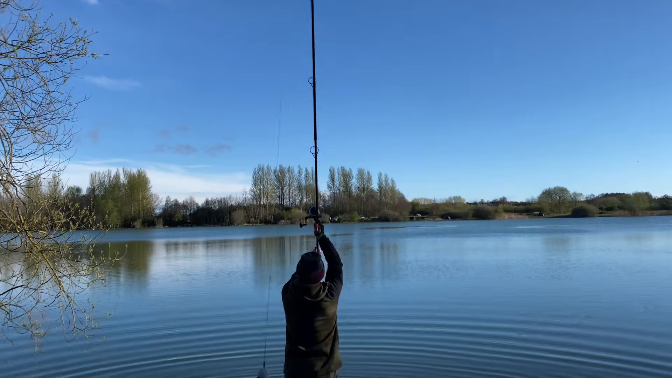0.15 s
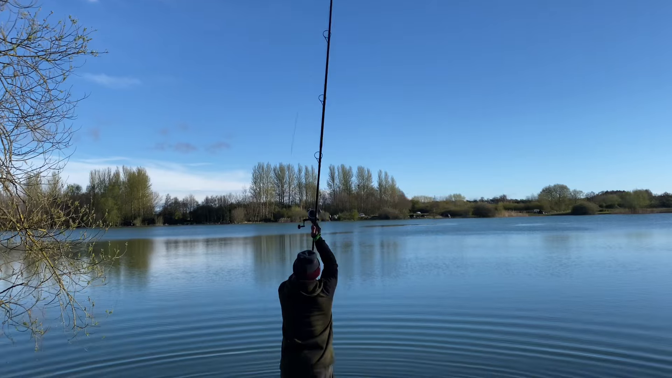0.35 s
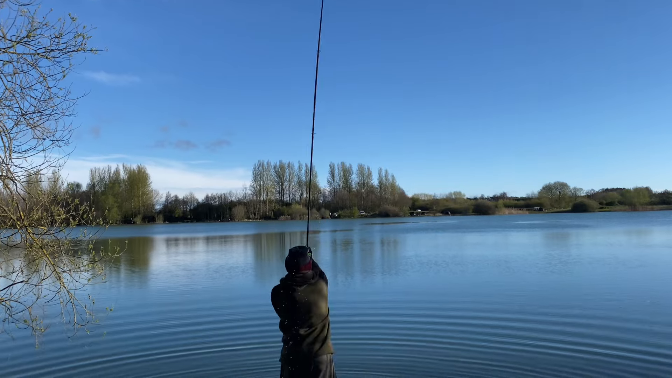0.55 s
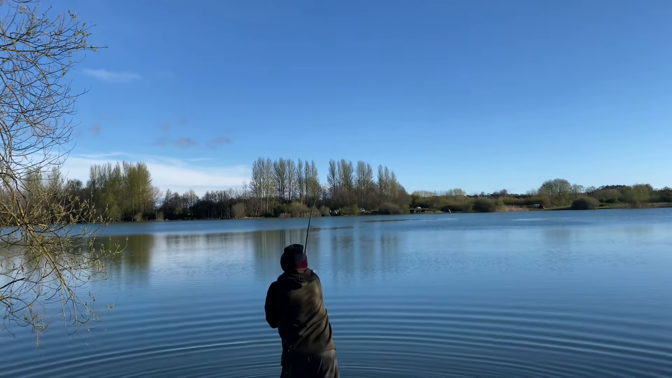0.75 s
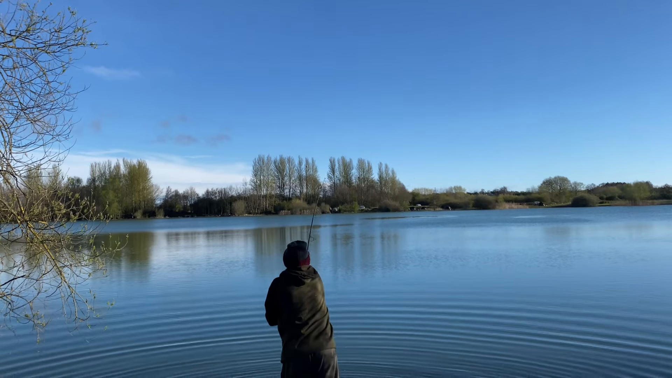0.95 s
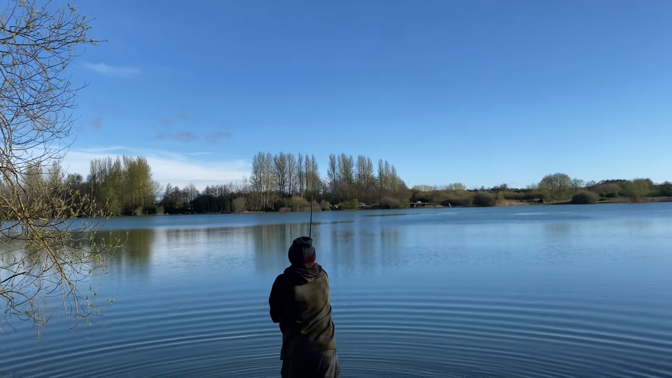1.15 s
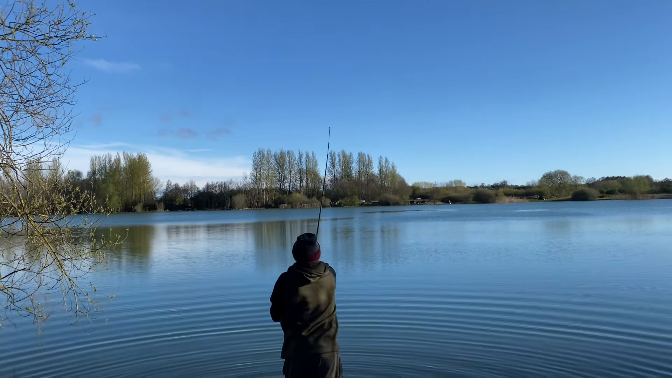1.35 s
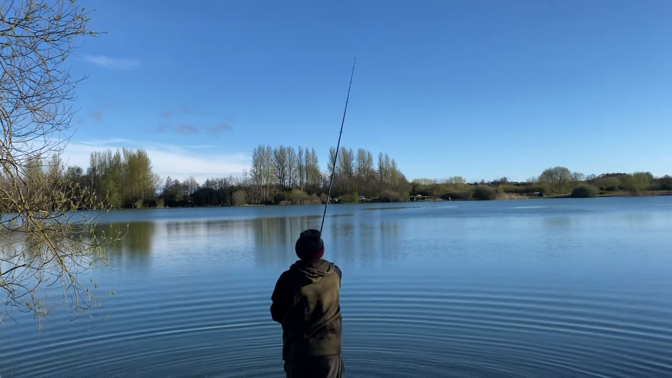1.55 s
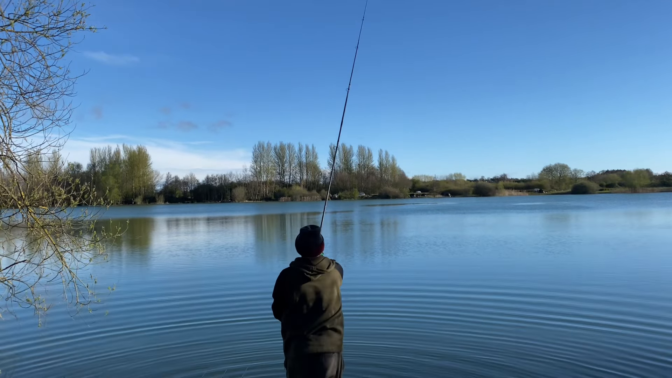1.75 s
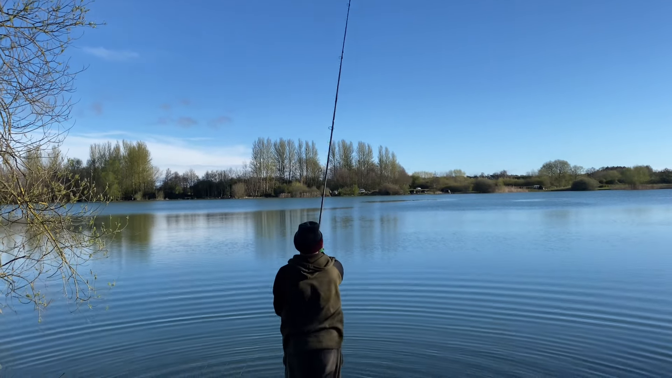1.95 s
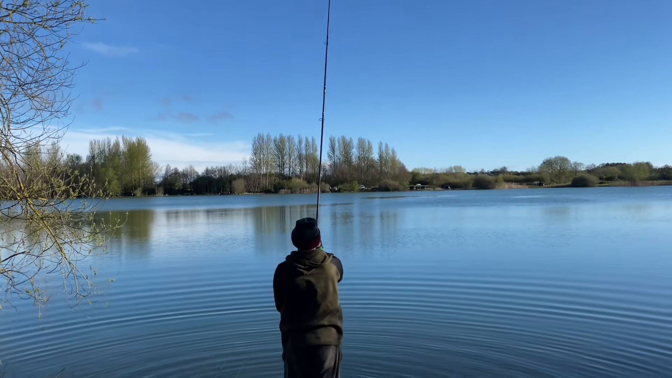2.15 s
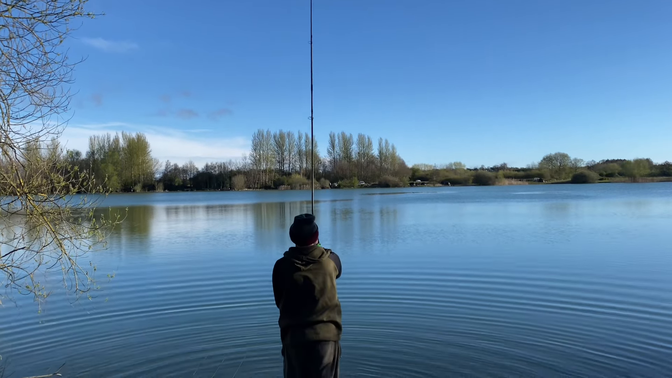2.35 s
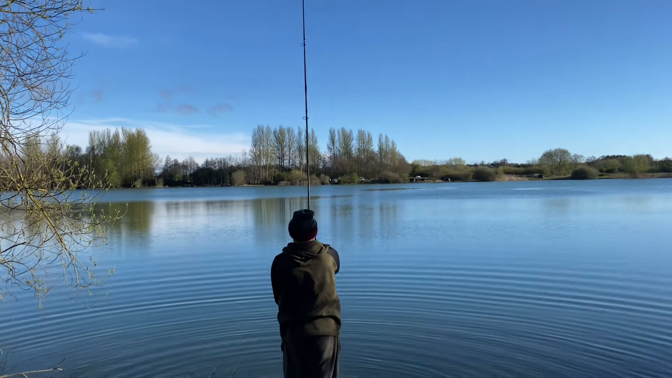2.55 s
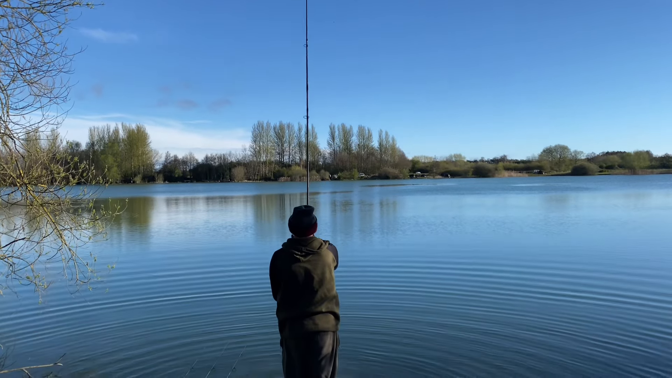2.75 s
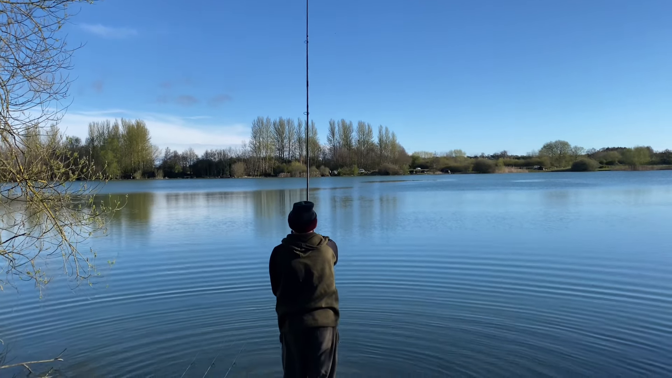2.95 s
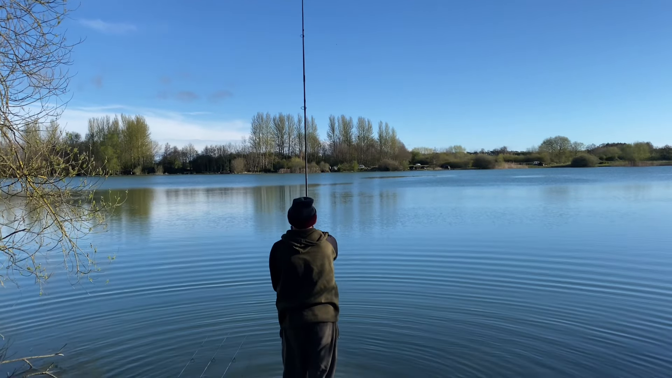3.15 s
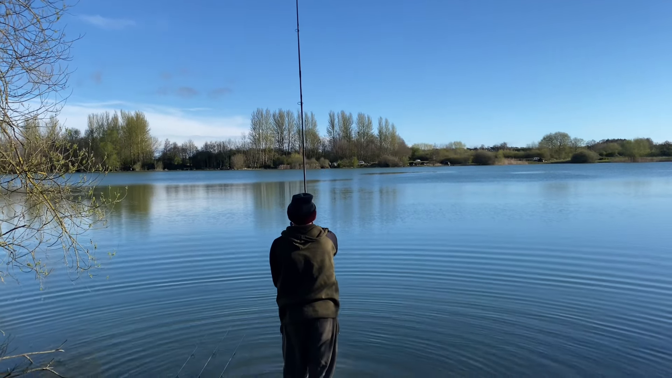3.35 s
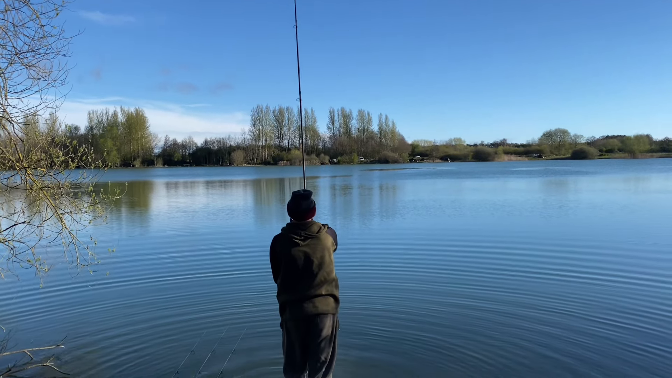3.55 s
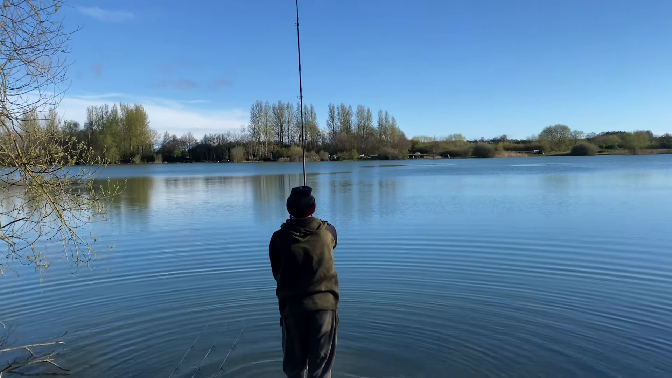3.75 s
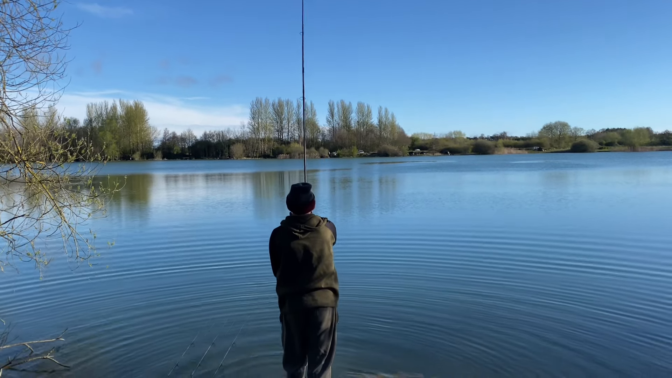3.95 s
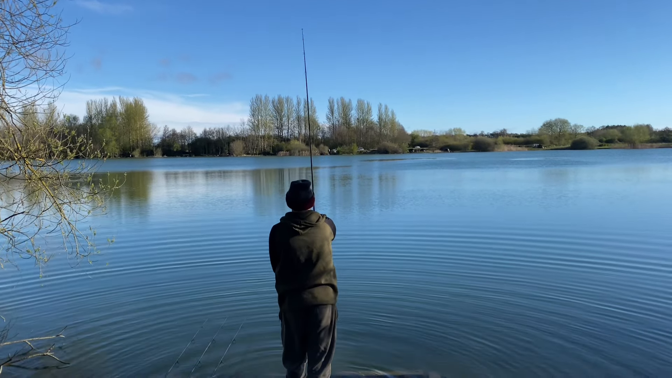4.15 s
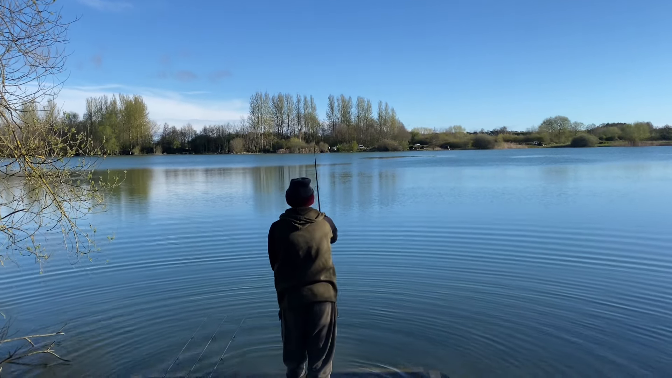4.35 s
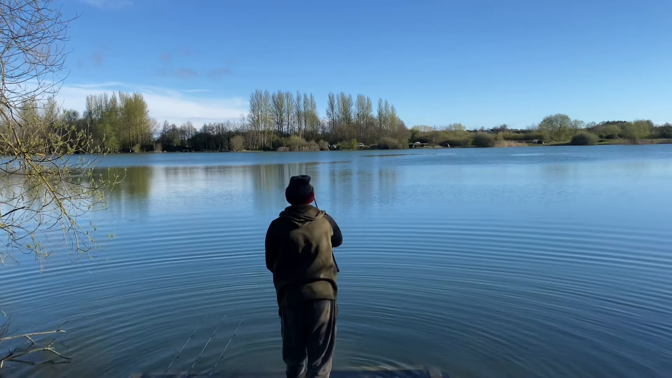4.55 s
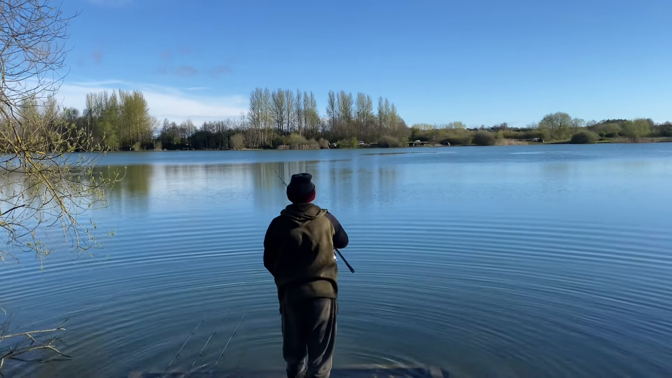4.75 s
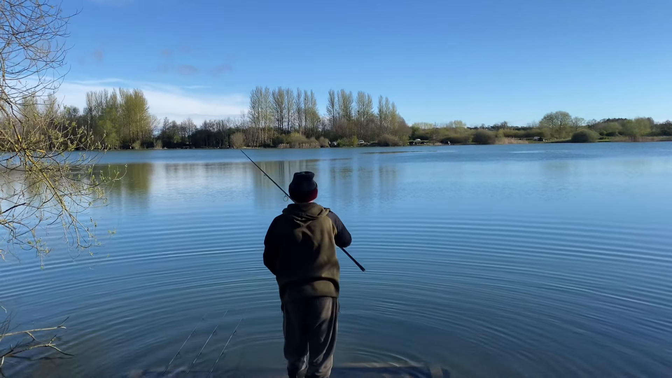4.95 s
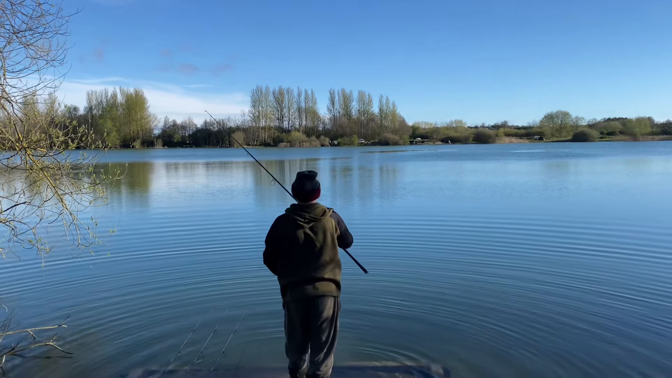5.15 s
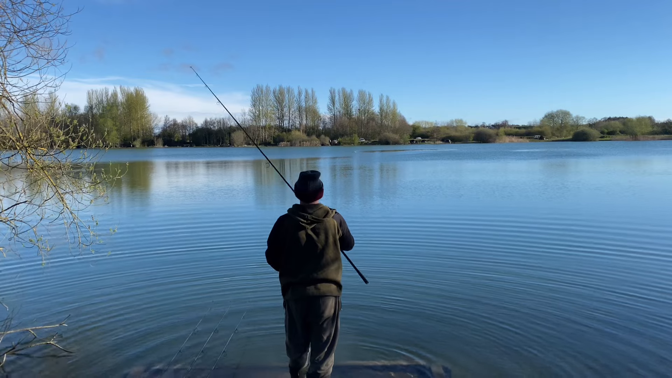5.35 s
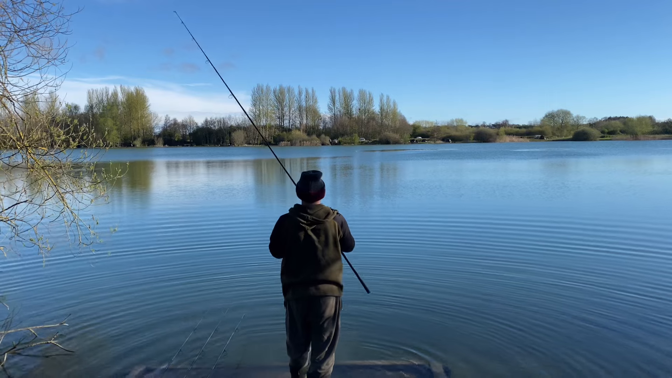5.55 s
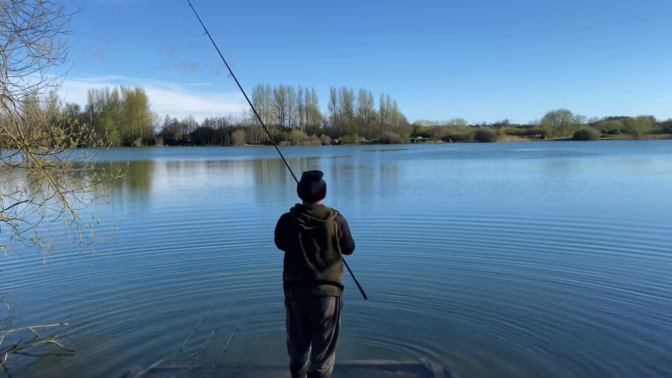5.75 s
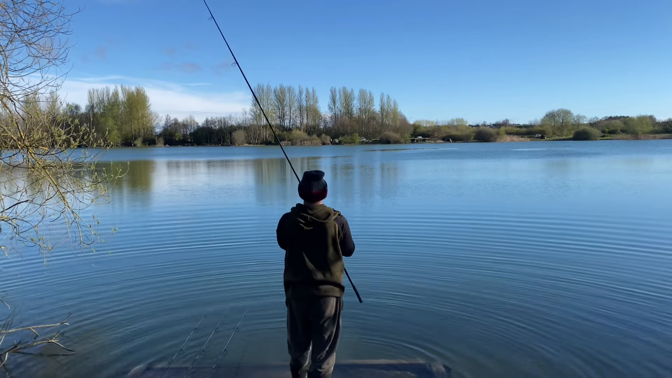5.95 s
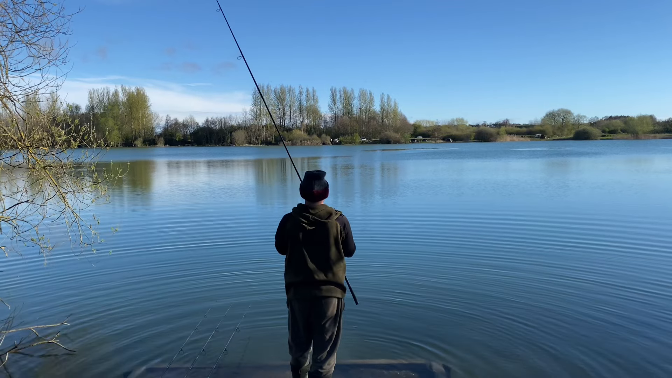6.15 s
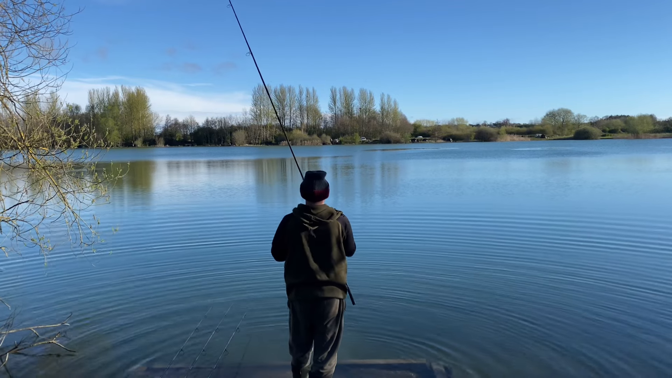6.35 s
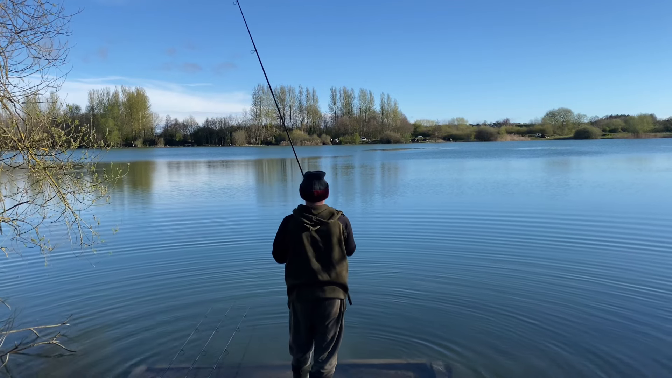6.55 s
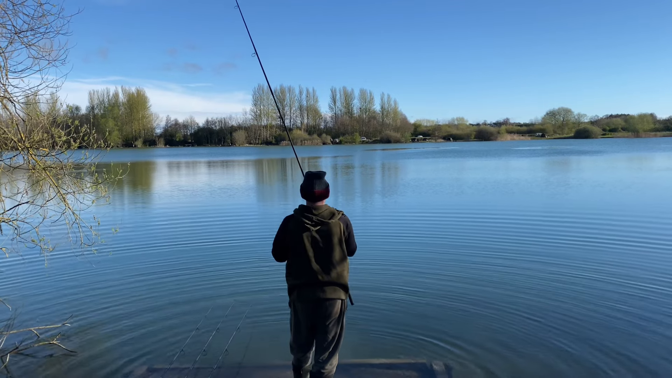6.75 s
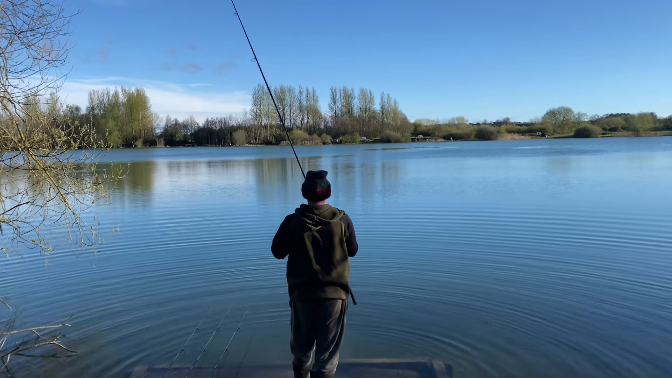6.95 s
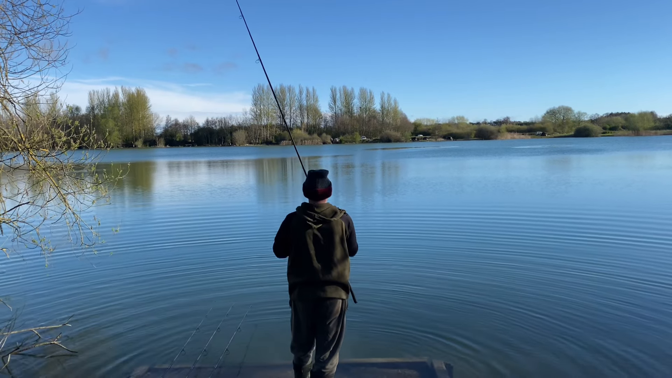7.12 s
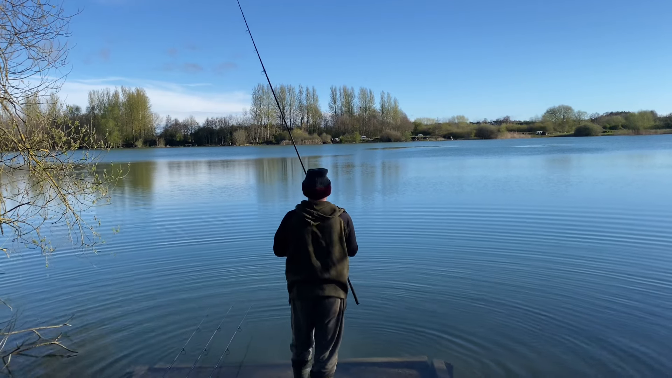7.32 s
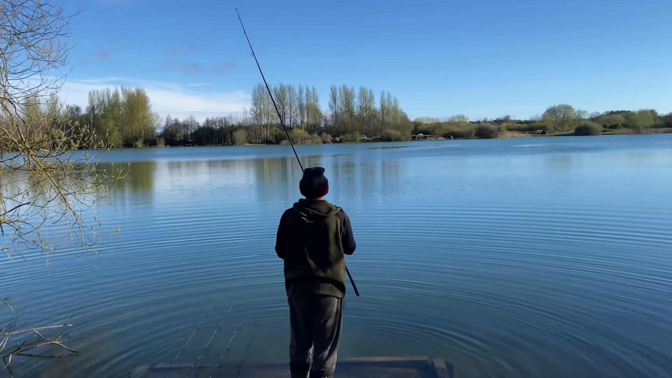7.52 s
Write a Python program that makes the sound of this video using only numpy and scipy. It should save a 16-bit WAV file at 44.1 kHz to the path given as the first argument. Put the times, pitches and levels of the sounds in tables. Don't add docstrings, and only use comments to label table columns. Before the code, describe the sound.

A fishing rod whooshes through a cast by a lake, line hisses off the reel and stops with a clack, then the reel clicks amid birdsong.

```python
import sys
import numpy as np
from scipy import signal
from scipy.fft import rfft, irfft, next_fast_len
from scipy.io import wavfile
from scipy.ndimage import uniform_filter1d

SR = 44100
rng = np.random.default_rng(int(sys.argv[2]) if len(sys.argv) > 2 else 0)


def attenuation_scalar(level_db):
    decades = np.asarray(level_db, float) / 20
    return 10 ** decades


def master_out(mix):
    frames = np.transpose(np.atleast_2d(mix))
    ceiling = np.clip(frames, -1, 1)
    pcm = np.round(ceiling * 32767).astype(np.int16)
    wavfile.write(sys.argv[1], SR, pcm)


N = 334278
TIME = np.arange(N) / SR
PADDED = next_fast_len(N, real=True)

# start_s, level_db
BREEZE_LEVEL = [(0.0, -53), (0.2, -47.5), (0.63, -47), (0.8, -55.5), (1.08, -59), (1.77, -59), (2.45, -51),
                (3.21, -50.5), (3.36, -54.5), (3.8, -48.5), (4.11, -53.5), (4.6, -47), (4.96, -51.5),
                (5.45, -46), (5.95, -49), (7.58, -49.5)]
# centre_s, level_db, pitch_hz, half_length_s
GUSTS = [
    (0.084, -24, 72, 0.011),
    (0.588, -25.5, 61, 0.013),
    (0.672, -24.5, 64, 0.0091),
    (2.347, -40, 55, 0.029),
    (.09, -35.5, 138, 0.0096),
    (5.283, -37.5, 66.5, 0.024),
    (6.7, -26.5, 68.6, 0.013),
    (7.457, -31.5, 63.4, 0.018),
]
# start_s, level_db
ROAD_LEVEL = [(0.0, -49), (0.4, -52.5), (0.63, -43), (0.78, -53), (1.77, -51.5), (2.22, -56.5),
              (3.21, -52.5), (3.8, -57.5), (4.11, -47.5), (4.96, -49), (5.45, -52.5), (5.95, -49.5),
              (6.69, -52), (7.58, -49.5)]
# frequency_hz, level_db
BUFFET_SPECTRUM = [(20, -28.5), (35, -19.5), (52, -5), (65, -4), (100, -5.5), (140, -24), (200, -42.5)]
DRONE_SPECTRUM = [(70, -28), (110, 2), (160, -0.5), (250, -5.5), (330, -11.5), (450, -18.5), (600, -27.5)]
ROAR_SPECTRUM = [(300, -11.5), (450, -1.5), (1000, -0.5), (1400, -5.5), (2000, -24.5), (3000, -47)]
LEAVES_SPECTRUM = [(1060, -21), (1800, -2.5), (3380, -12.5), (4470, -6), (5450, -14.5), (7230, -12),
                   (8600, -27), (10400, -20.5), (13000, -31)]
LEAVES_DB = -81
ROAR_DB, ROAR_FOLLOWS = -64.5, 0.05

# start_s, length_s, pitch_hz, level_db
WHISTLES = [(0.384, 0.038, 4310, -78), (1.102, 0.058, 5070, -71.5), (1.368, 0.073, 4900, -71),
            (1.36, 0.16, 4530, -74), (1.375, 0.045, 4210, -71), (1.479, 0.091, 3130, -64),
            (2.04, 0.05, 3460, -67), (2.193, 0.079, 2945, -68), (2.558, 0.043, 5850, -66.5),
            (4.07, 0.091, 3805, -79), (4.528, 0.2, 2260, -84), (3.994, 0.29, 3077, -83.5),
            (5.229, 0.043, 4370, -69), (5.456, .045, 8430, -79.5), (5.53, 0.13, 8400, -80),
            (5.55, .15, 6230, -91), (6.977, 0.11, 2600, -88)]
RISES = [
    (0.157, 0.015, 3760, -76),
    (2.609, 0.07, 6010, -65.5),
    (2.811, 0.092, 3756, -61.5),
    (4.018, 0.03, 3500, -85),
    (4.232, 0.083, 4540, -79),
    (6.68, 0.027, 6250, -87.5),
]
SLURS = [(0.388, 0.014, 3340, -69.5), (0.428, 0.018, 3360, -64), (.465, 0.027, 3470, -67),
         (.94, 0.06, 6300, -72), (0.987, 0.024, 3350, -68), (2.741, 0.048, 3620, -69),
         (4.16, 0.038, 3330, -70), (4.177, 0.064, 4800, -79), (4.223, 0.03, 3410, -69.5),
         (4.445, 0.03, 3220, -77), (5.096, 0.031, 5510, -73.5), (5.194, .036, 3810, -62),
         (5.68, 0.046, 7850, -85), (5.73, 0.096, 6770, -89), (6.387, .07, 4860, -83)]
BURRS = [(1.123, 0.237, 2078, -68), (2.917, .3, 4060, -74), (2.6, 0.136, 3625, -78.5),
         (4.273, 0.11, 3440, -81), (4.357, 0.179, 4320, -81.5), (4.664, 0.091, 4660, -84),
         (4.939, 0.29, 1780, -75), (5.144, 0.086, 4890, -77.5), (5.295, 0.31, 4680, -76.5),
         (5.768, 0.065, 4320, -82.5), (6.013, 0.22, 2440, -78.5), (5.998, 0.23, 3480, -85),
         (6.619, 0.015, 4270, -75.5), (7.134, 0.24, 1848, -75.5), (7.362, .17, 8640, -91),
         (7.52, 0.032, 8750, -86)]
# start_s, spacing_s, count, pitch_step_share
RHYTHMS = [
    (4.46, .1025, 5, -.018),
    (4.815, .038, 6, -.004),
    (4.8, .041, 6, -.014),
    (6.641, .0403, 9, .002),
    (7.008, .06, 2, .04),
    (7.014, .06, 2, .03),
    (7.155, .0965, 4, 0),
    (7.163, .096, 4, 0),
]
# length_s, start_hz, turning_hz, end_hz, burr_hz
TRILL_NOTES = [
    (.045, 7900, 7200, 6100, 25),
    (.022, 3300, 2800, 2780, 25),
    (.016, 3850, 3900, 3800, 30),
    (.02, 3700, 4150, 3750, 25),
    (.034, 3850, 4450, 4100, 25),
    (.03, 4400, 5000, 5300, 40),
    (.036, 3750, 4800, 4450, 30),
    (.028, 4500, 5200, 5600, 40),
]
TRILL_DB = [-74.5, -70, -76.5, -71, -71, -73, -73, -76.5]

# pitch_hz, width_hz, level_db, rise_s, t60_s
RELEASE_MODES = [(7060, 11900, 0, 0.00045, 0.016), (5560, 4000, -7.5, .035, 0.13),
                 (2600, 300, -9.5, 0.015, .1)]
CATCH_MODES = [(916, 99, -8, 0.02, 0.17), (2065, 380, -3.5, 0.012, 0.1), (2860, 3540, -5, .002, 0.28),
               (3980, 710, -1, .013, 0.057), (3200, 2900, -11, 0.043, 0.084), (7200, 2000, -17, .012, .15),
               (11000, 4600, -13, 0.012, 0.15)]
HANDLE_MODES = [(1350, 280, -4, .038, 0.07), (1910, 840, -7, 0.012, 0.37), (3130, 1860, 0, 0.0067, 0.44),
                (7100, 2200, -12, 0.02, 0.33), (9500, 2800, -23, 0.01, 0.47)]
BAIL_MODES = [(1250, 300, -4.5, 0.0008, 0.077), (3000, 370, -0.5, 0.0023, 0.035),
              (3630, 6600, -7.5, 0.00043, 0.051), (2280, 3200, -16, 0.018, 0.15),
              (9500, 6000, -21, 0.00069, .04), (7650, 7000, -18, 0.036, 0.13),
              (3100, 150, -28, 0.018, 0.47)]
LATCH_MODES = [(1840, 590, -0.5, 0.0012, 0.058), (3620, 910, -3.5, .001, 0.058),
               (6000, 2600, -2.5, 0.0015, 0.067), (10200, 3000, -9, 0.0018, 0.036)]
# start_s, level_db, brightness_db_per_octave
LATCH_CLICKS = [
    (.348, -63, 1.5),
    (5.427, -64, 0.5),
    (7.033, -58.5, -3),
]
# start_s, level_db, pitch_hz, width_hz, t60_s
CREAKS = [
    (.675, -53.5, 3400, 394, 0.28),
    (.725, -50.5, 1660, 600, 0.095),
    (0.825, -58.5, 4000, 5000, 0.18),
    (0.821, -51, 1395, 200, 0.089),
    (1.746, -53.5, 2920, 1200, 0.016),
    (2.254, -48, 2000, 300, 0.012),
    (2.275, -61, 4000, 3000, 0.025),
    (5.54, -70.5, 2230, 1500, 0.066),
    (5.709, -73, 1960, 298, .08),
]
CREAK_RISE = 0.043
# start_s, level_db
RELEASE_AT, CATCH_AT, HANDLE_AT, BAIL_AT = (.572, -38), (3.87, -47), (5.924, -57), (6.215, -43)

# start_s, low_swish_db, high_over_low_db
WHIP_LEVEL = [
    (0.44, -90, 9),
    (0.458, -64, -17),
    (0.52, -64.5, 4.5),
    (0.622, -47, -1.5),
    (0.76, -57.5, -3.5),
    (0.92, -82.5, 11.5),
]

# start_s, lip_drag_db, ring_and_blank_slap_db
LINE_LEVEL = [
    (0.47, -83, 0),
    (0.58, -48.5, 6),
    (0.75, -59, 6),
    (0.8, -65, 0),
    (1.3, -67, -2),
    (1.72, -59.5, 0.5),
    (2.23, -68, 4),
    (2.5, -75.5, -0.3),
    (3.86, -78.5, -1.5),
]
# start_s, coils_per_s
COIL_RATE = [
    (.5, 165),
    (1.5, 144),
    (2.2, 120),
    (2.7, 96),
    (3.5, 82),
    (3.9, 77),
]
# frequency_hz, level_db
LIP_SPECTRUM = [(8900, -37), (9050, -9), (10800, -12.5), (12500, -15), (12900, -49.5), (14200, -40),
                (14500, -10.5), (15700, -20)]
RING_SPECTRUM = [(5900, -18), (6300, -11), (7400, -7), (8150, -16), (8350, -35)]
BLANK_SPECTRUM = [(2400, -20), (2900, -9), (4300, -4), (5600, -5.5), (6000, -14)]
# frequency_hz, level_db
BUTT_SPECTRUM = [(900, -10.5), (1500, -4), (2000, -5.5), (2700, -8), (3100, -21)]
RING_DB, BLANK_DB, BUTT_DB = -70.5, -72, -71.5
RING_DB_PER_S, BLANK_DB_PER_S, BUTT_DB_PER_S = 0.3, -0.5, -3.5
SETTLED_S, CAUGHT_S, STOP_DB_PER_S = 0.91, 3.9, -420
COILS_PER_LAYER, AT_LIP_S = 19.5, 3.03

# start_s, level_db, start_hz, end_hz, length_s
DRIPS = [
    (1.748, -47, 614, 1310, 0.058),
    (2.623, -50, 634, 785, 0.0062),
    (2.66, -60, 700, 850, 0.011),
    (3.161, -45, 600, 750, 0.005),
    (3.203, -56, 726, 890, 0.0086),
    (3.266, -45.5, 620, 770, 0.0042),
    (3.304, -57.5, 600, 850, 0.01),
]

# frequency_hz, level_db
MICROPHONE_RESPONSE = [(1, -1), (8200, 1.5), (8500, -6.5), (8900, 7.5), (9150, 0), (13000, -0.5),
                       (13500, -20.5), (14300, -15.5), (14700, 3), (15650, -4), (15850, -69)]


def response(points):
    hz, db = np.transpose(points)
    f = np.arange(PADDED // 2 + 1) * SR / PADDED + 1
    return attenuation_scalar(np.interp(np.log(f), np.log(hz), db, left=-90, right=-90))


def noise(points):
    real, imaginary = rng.standard_normal((2, 2, PADDED // 2 + 1))
    y = irfft((real + 1j * imaginary) * response(points), PADDED)[:, :N]
    return y / np.std(y)


def walk(rate):
    k = int(SR / rate)
    held = np.repeat(rng.standard_normal(N // 128)[:N // k + 1], k)[:N]
    return 1.6 * uniform_filter1d(uniform_filter1d(held, k), k)


def curves(table, off_db=-60):
    s, *columns = np.transpose(table)
    out = [np.interp(TIME, s, c) for c in columns]
    outside_s = np.maximum(s[0] - TIME, TIME - s[-1])
    out[0] = out[0] + off_db * np.clip(outside_s / 0.15, 0, 1)
    return out


def ports(x, lag, pan_db, share=0.):
    main, apart = x if x.ndim == 2 else (x, 0)
    share = np.clip(share, 0, 1)
    delayed = np.interp(TIME - lag / SR, TIME, main)
    left = np.sqrt(1 - share) * delayed + np.sqrt(share) * apart
    return np.array([left * attenuation_scalar(pan_db / 2), main * attenuation_scalar(-pan_db / 2)])


def add(out, s, x):
    i = int(s * SR)
    out[i:i + len(x)] += x[:N - i]


def echoes(x, t60, wet_db):
    t = np.arange(SR // 2) / SR
    decay = np.exp(-np.log(1000) * t / t60)
    tail = rng.standard_normal((2, len(t))) * decay * np.clip(t / 0.0028, 0, 1)
    return attenuation_scalar(wet_db) * signal.oaconvolve(x[None], tail / np.linalg.norm(tail[0]), axes=1)[:, :N]


def air():
    buffet_db = np.interp(TIME, *np.transpose(BREEZE_LEVEL))
    drone_db = np.interp(TIME, *np.transpose(ROAD_LEVEL))
    low = attenuation_scalar(buffet_db + 1.5 + 1.3 * walk(12)) * noise(BUFFET_SPECTRUM)
    for s, db, hz, half in GUSTS:
        t = TIME[:SR // 6] - 1 / 12
        pulse = np.exp(-(t / half) ** 2 / 2) * np.cos(2 * np.pi * hz * t)
        add(low[0], s - 1 / 12, attenuation_scalar(db) * pulse)
    out = ports(low, 60, .6, .12)
    roar_db = ROAR_DB + ROAR_FOLLOWS * (drone_db - np.mean(drone_db))
    for points, db, lag, pan_db, share in (
            (DRONE_SPECTRUM, drone_db + 0.72, 23, .2, .08),
            (ROAR_SPECTRUM, roar_db, -14, -1.5, .45),
            (LEAVES_SPECTRUM, LEAVES_DB, -3, -1.4, .8)):
        gain = attenuation_scalar(db + .6 * walk(6))
        out += ports(gain * noise(points), lag, pan_db, share)
    return out


def note(length, path_hz, db, burr_hz):
    u = np.arange(int(length * SR)) / (length * SR)
    size = max(int(SR / (2.3 * burr_hz)), 1)
    flutter = uniform_filter1d(rng.standard_normal((2, SR // 3)), size, axis=1, mode="wrap")
    flutter = flutter[:, :len(u)] * np.sqrt(size / 2)
    hz = np.interp(u ** .8, np.linspace(0, 1, len(path_hz)), path_hz)
    tone = np.exp(2j * np.pi * np.cumsum(hz) / SR)
    clean = np.exp(-burr_hz / 60)
    voice = clean + (1 - clean) * (flutter[0] + 1j * flutter[1])
    return attenuation_scalar(db) * np.sqrt(2) * np.sin(np.pi * u) ** .5 * (voice * tone).real


def birds():
    far, right, left = np.zeros((3, N))
    for notes, glide, burr_hz in ((WHISTLES, -.015, 25), (RISES, .08, 35), (SLURS, -.15, 40), (BURRS, -.02, 250)):
        for s, length, hz, db in notes:
            path = [hz * (1 - glide / 2), hz * (1 + glide / 2)]
            add(far, s, note(length, path, db, burr_hz))
    for rhythm, trill, db in zip(RHYTHMS, TRILL_NOTES, TRILL_DB):
        s, spacing, times, step = rhythm
        length, *path_hz, burr_hz = trill
        side = left if s > 6 else right
        for k in range(times):
            path = np.array(path_hz) * (1 + step * k)
            add(side, s + k * spacing, note(length, path, db, burr_hz))
            add(side, s + k * spacing + .004, note(length, 1.06 * path, db - 6, burr_hz))
    direct = ports(far, -2, -3.1) + ports(right, 1, -4.1) + ports(left, -10, -1.2)
    return direct + echoes(far, .5, -3) + echoes(right, .5, -1) + echoes(left, .5, -4)


def scrape(db, hz, width, rise, t60):
    t = np.arange(SR // 2) / SR
    ragged_db = np.repeat(rng.standard_normal(len(t) // 63), 63)
    push = rng.standard_normal(len(t)) * attenuation_scalar(2.6 * ragged_db)
    edges = np.clip([hz - width / 2, hz + width / 2], 50, 20000)
    ring = signal.sosfilt(signal.butter(3, edges, "bandpass", fs=SR, output="sos"), push)
    decay = np.exp(-np.log(1000) * np.maximum(t - rise, 0) / t60)
    return attenuation_scalar(db) * ring / np.std(ring) * np.minimum(t / rise, 1) * decay


def tackle():
    out = np.zeros(N)
    for modes, (s, db) in ((RELEASE_MODES, RELEASE_AT), (CATCH_MODES, CATCH_AT),
                           (HANDLE_MODES, HANDLE_AT), (BAIL_MODES, BAIL_AT)):
        for hz, width, mode_db, rise, t60 in modes:
            add(out, s, scrape(db + mode_db, hz, width, rise, t60))
    for s, db, tilt_db in LATCH_CLICKS:
        for hz, width, mode_db, rise, t60 in LATCH_MODES:
            bright_db = tilt_db * np.log2(hz / LATCH_MODES[0][0])
            add(out, s, scrape(db + mode_db + bright_db, hz, width, rise, t60))
    for s, db, hz, width, t60 in CREAKS:
        add(out, s, scrape(db, hz, width, CREAK_RISE * t60, t60))
    return ports(out, -3, -1.3) + echoes(out, .12, -10)


def whip():
    low_db, high_db = curves(WHIP_LEVEL)
    low = noise([(150, -21.5), (300, -4.5), (1100, 0.5), (1700, -1.0), (2500, -6.0), (3200, -7.5)])
    high = noise([(2400, -34), (3000, -9.5), (5000, -11.5), (8000, -13.5), (8500, -10)])
    low = low * attenuation_scalar(1.0 + 1.4 * walk(60))
    high = high * attenuation_scalar(high_db + 1.2 * walk(80))
    return ports(attenuation_scalar(low_db) * (low + high), -1.45, -1.4, 0.6)


def line():
    start_s, *levels = np.transpose(LINE_LEVEL)
    lip_db, slap_db = (np.interp(TIME, start_s, c, left=-150) for c in levels)
    rate = np.interp(TIME, *np.transpose(COIL_RATE))
    turn = np.cumsum(rate * (1 + 0.0364 * walk(36.9))) / SR
    depth = np.interp(TIME, [1, 3.8], [.12, .25])
    wound = np.cumsum(rate) / SR / COILS_PER_LAYER
    layer = np.cos(2 * np.pi * (wound - np.interp(AT_LIP_S, TIME, wound)))
    layer = layer * np.interp(TIME, [1.9, 2.6], [.5, 2.4])
    stop_db = STOP_DB_PER_S * np.maximum(TIME - CAUGHT_S, 0)
    flick = (1 + depth * np.cos(2 * np.pi * turn)) * attenuation_scalar(0.67 * walk(300) + stop_db)
    late = attenuation_scalar(-40 * np.clip((SETTLED_S - TIME) / 0.12, 0, 2))
    out = attenuation_scalar(layer + lip_db) * ports(flick * noise(LIP_SPECTRUM), 8, -0.19, 0.11)
    for points, db, db_per_s, lag, pan_db, share in (
            (RING_SPECTRUM, RING_DB, RING_DB_PER_S, -4, -4.1, .35),
            (BLANK_SPECTRUM, BLANK_DB, BLANK_DB_PER_S, -3, -2.2, .6),
            (BUTT_SPECTRUM, BUTT_DB, BUTT_DB_PER_S, -3, -1.2, .5)):
        gain = flick * late * attenuation_scalar(db + db_per_s * (TIME - SETTLED_S) + slap_db)
        gain = gain * attenuation_scalar(.4 * layer + .7 * walk(12))
        out += ports(gain * noise(points), lag, pan_db, share)
    return out


def drips():
    out = np.zeros(N)
    for s, db, start_hz, end_hz, length in DRIPS:
        u = np.arange(int(length * SR)) / (length * SR)
        shape = np.minimum(u * length / .001, 1) * np.exp(-.9 * u) * np.minimum((1 - u) / .15, 1)
        hz = start_hz + (end_hz - start_hz) * u ** 0.93
        add(out, s, attenuation_scalar(db) * shape * np.sin(2 * np.pi * np.cumsum(hz) / SR))
    return ports(out, -9, -1.2) + echoes(out, .1, -13)


def scene():
    return air() + birds() + tackle() + whip() + line() + drips()


def band_limit(x):
    return signal.sosfilt(signal.butter(12, 16240, fs=SR, output="sos"), x)


def record(dry):
    closed = np.hstack([dry, np.linspace(dry[:, -1], dry[:, 0], PADDED - N, axis=1)])
    heard = irfft(rfft(closed) * response(MICROPHONE_RESPONSE), PADDED)[:, :N]
    return band_limit(heard)


dry = scene()
out = record(dry)
master_out(out)
```